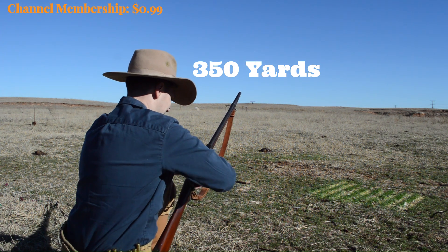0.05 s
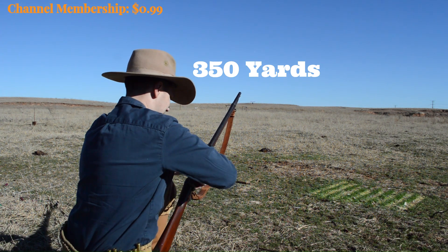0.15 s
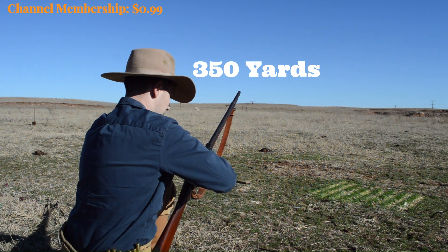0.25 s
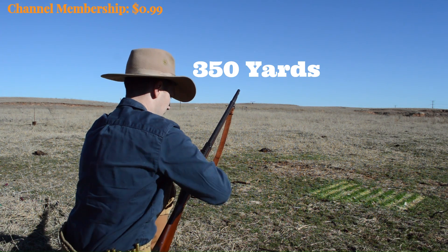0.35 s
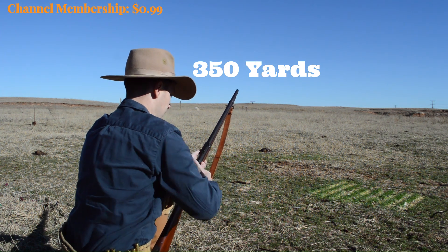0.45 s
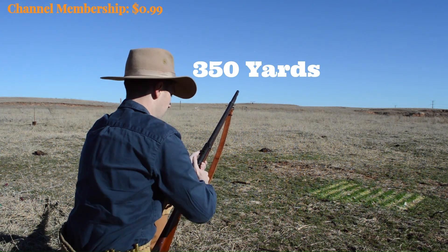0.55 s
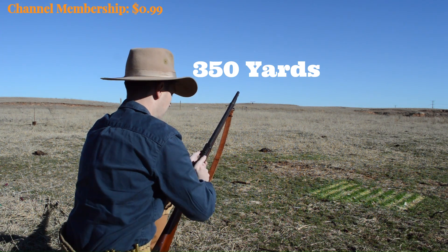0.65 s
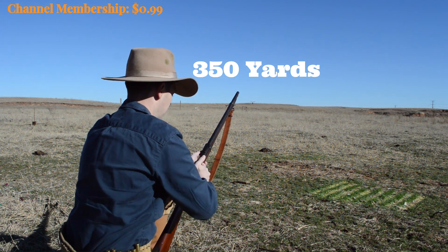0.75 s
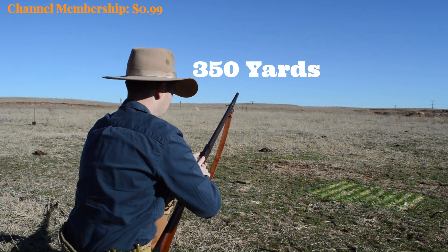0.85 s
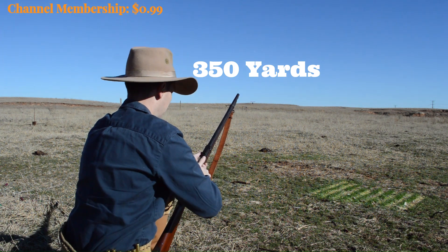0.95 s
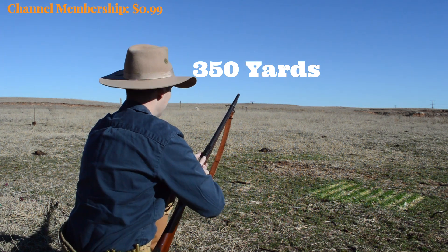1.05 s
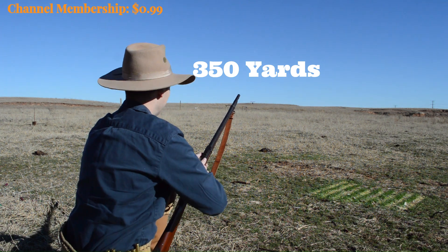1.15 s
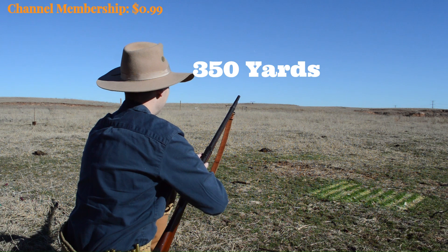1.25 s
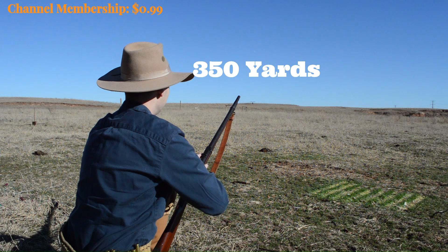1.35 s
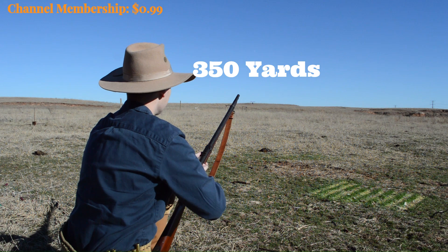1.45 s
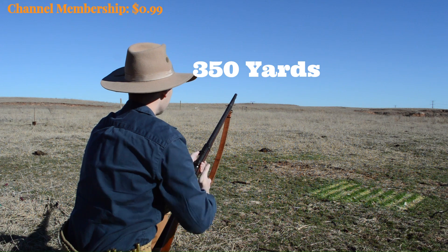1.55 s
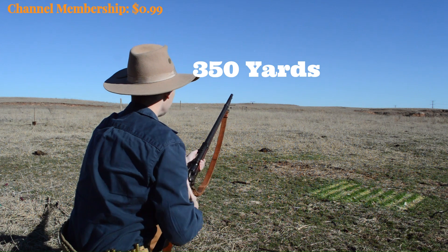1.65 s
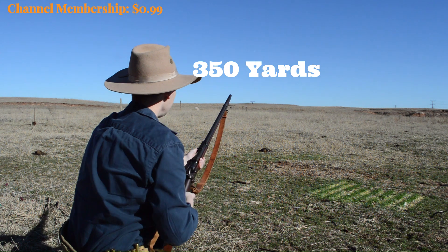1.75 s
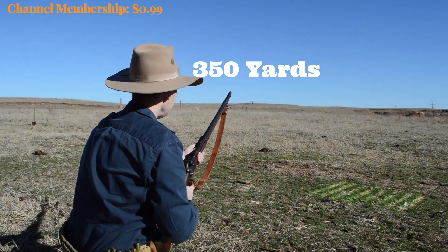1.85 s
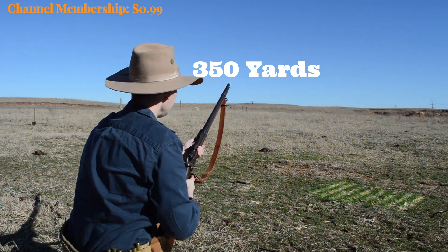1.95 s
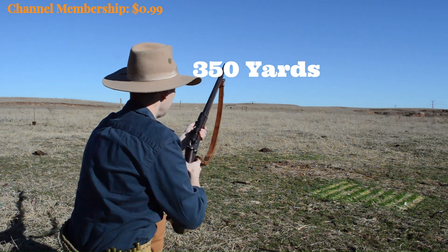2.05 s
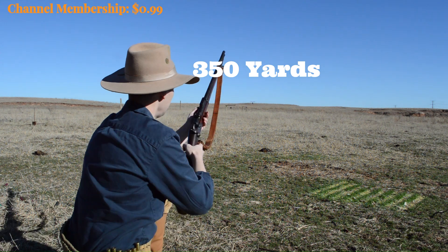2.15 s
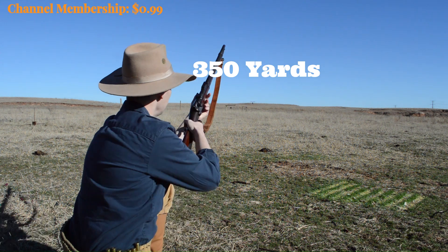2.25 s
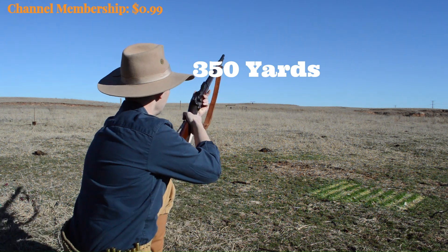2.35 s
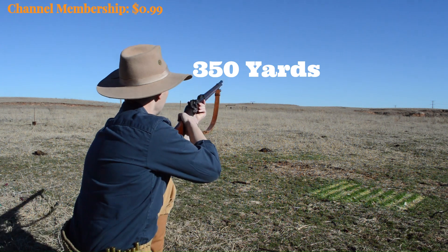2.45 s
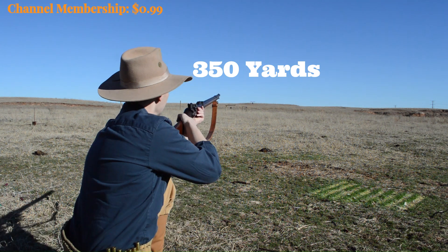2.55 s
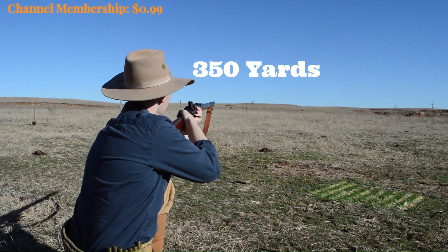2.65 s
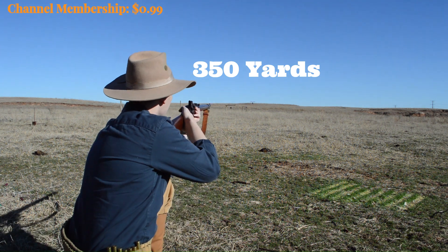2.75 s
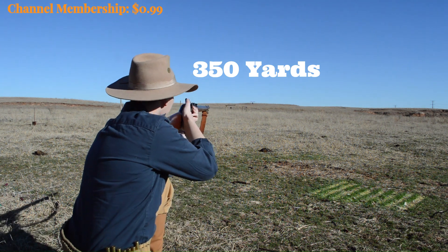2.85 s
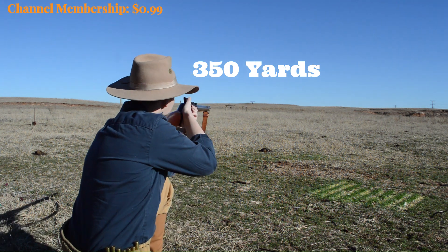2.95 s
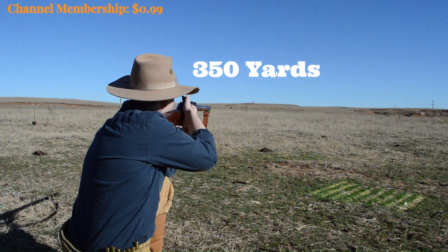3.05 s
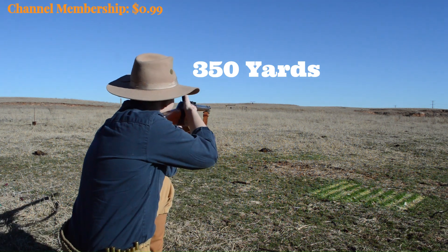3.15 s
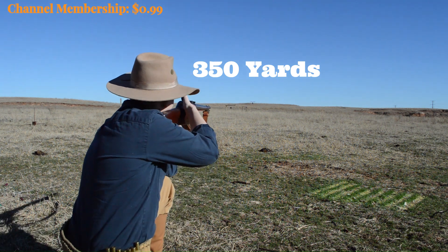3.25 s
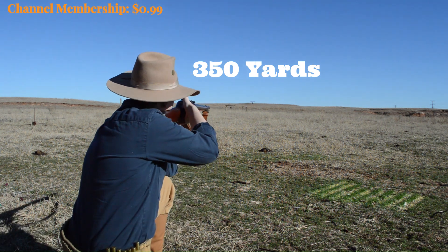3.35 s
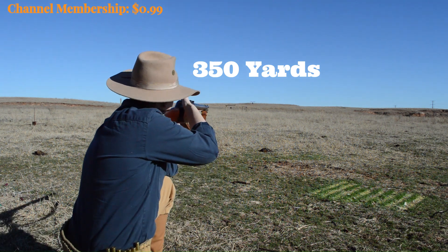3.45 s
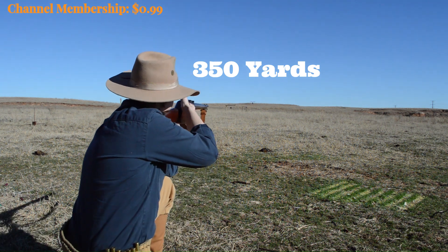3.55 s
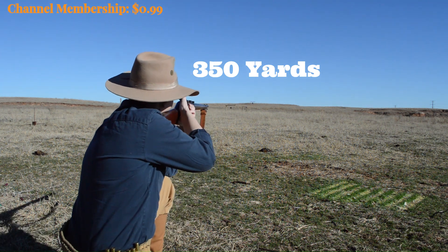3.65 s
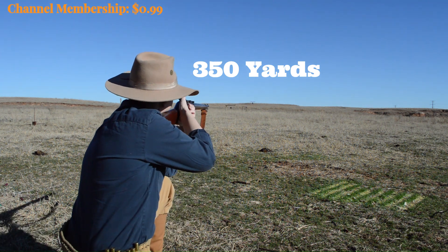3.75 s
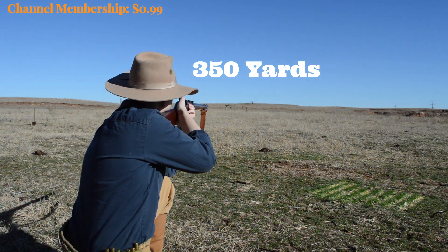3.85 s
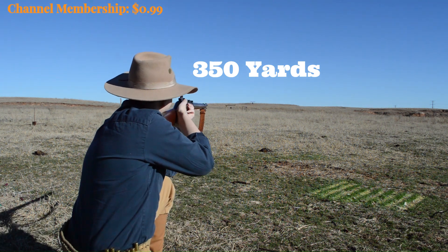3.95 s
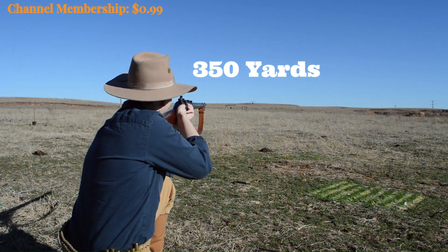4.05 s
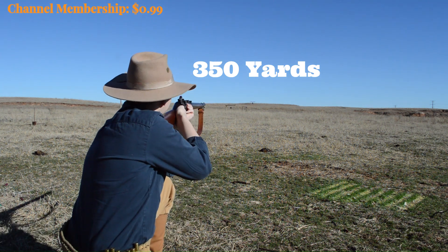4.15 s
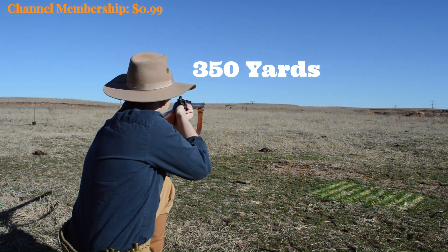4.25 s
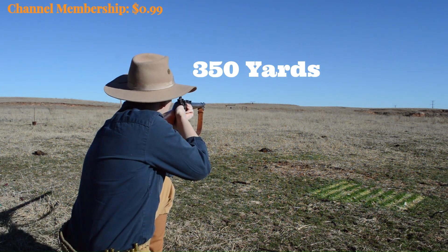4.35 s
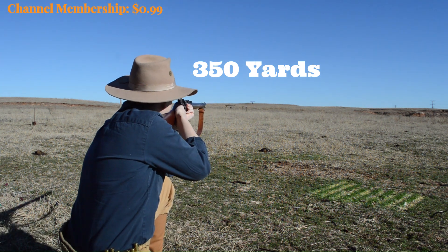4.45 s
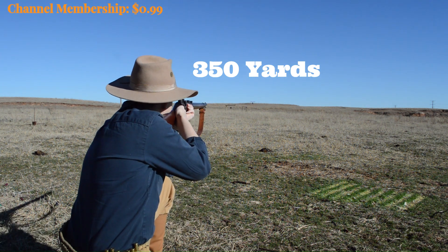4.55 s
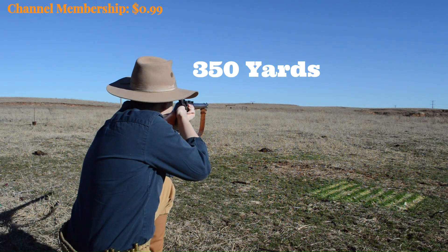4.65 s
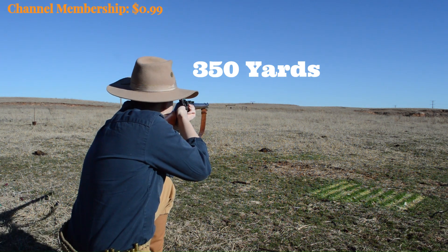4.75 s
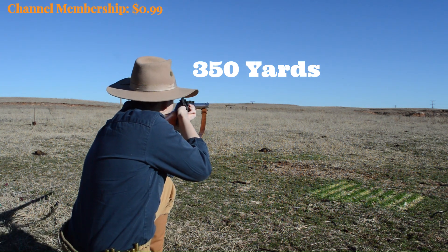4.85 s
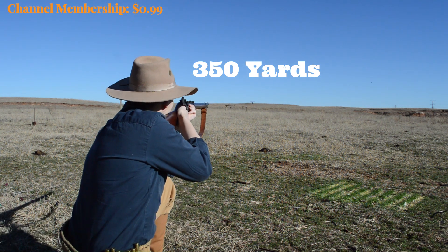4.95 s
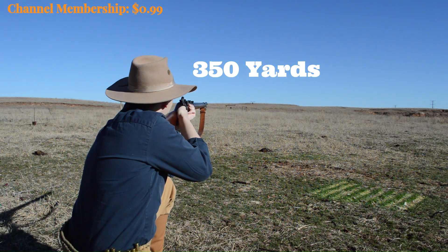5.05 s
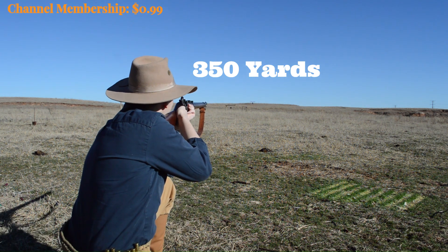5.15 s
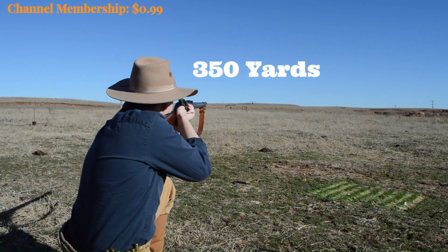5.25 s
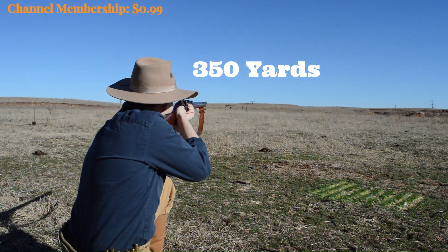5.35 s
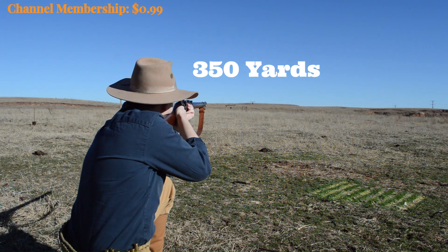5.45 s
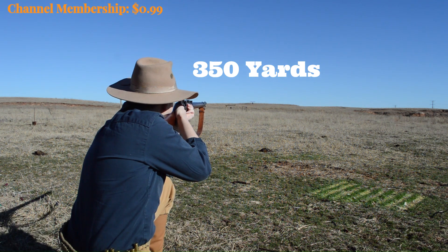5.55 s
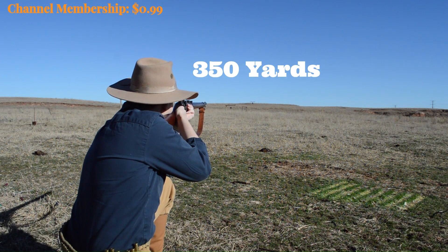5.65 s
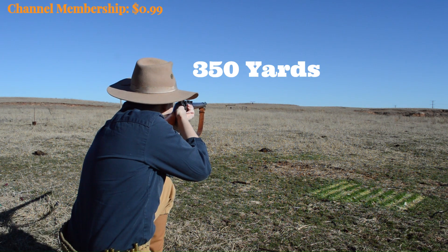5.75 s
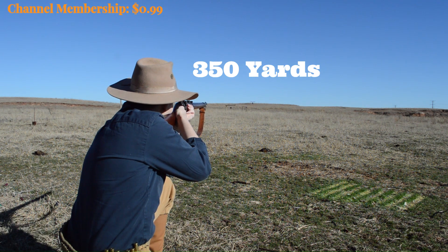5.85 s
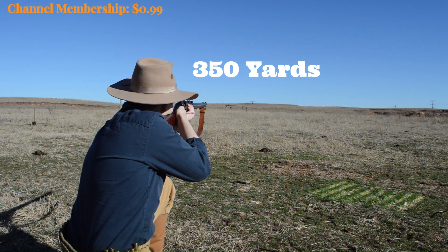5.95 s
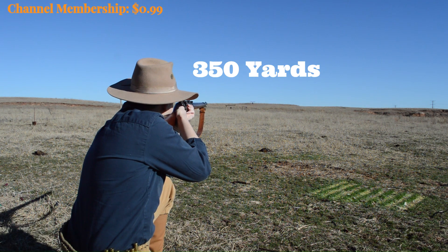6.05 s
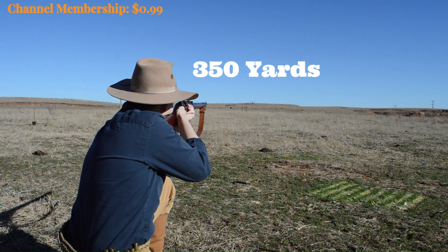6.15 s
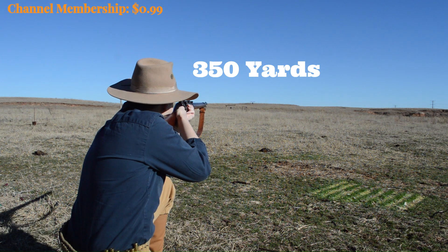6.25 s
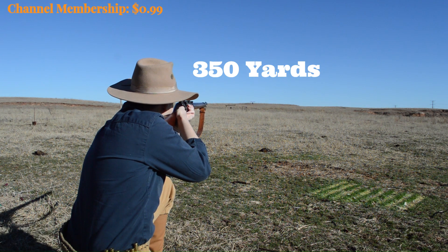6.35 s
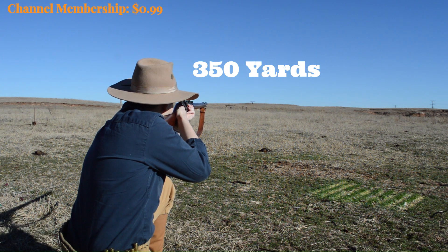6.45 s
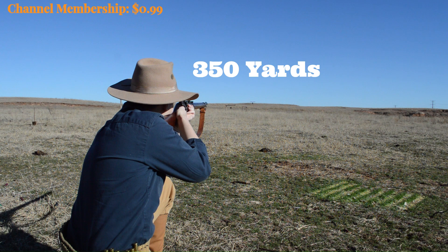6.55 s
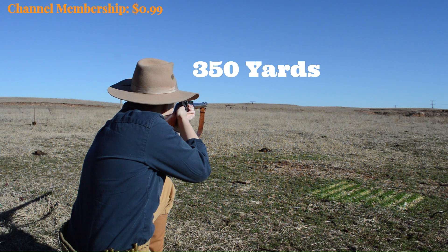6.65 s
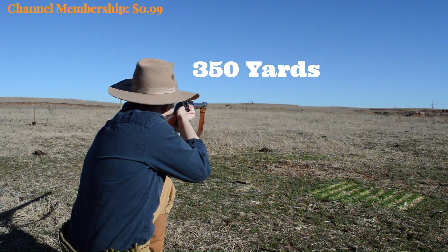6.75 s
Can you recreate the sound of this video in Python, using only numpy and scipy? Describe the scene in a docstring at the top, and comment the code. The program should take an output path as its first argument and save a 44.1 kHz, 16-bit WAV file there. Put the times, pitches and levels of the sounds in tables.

```python
"""A rifle's steel action snaps and ticks close by: each blow rings dying modes of steel and wooden stock.
Before and between the blows, sleeve and sling rustle and a shirt scrapes over the microphone, made of
coloured noise and tiny snaps; dragged cloth shudders in stick-slip tones, and bumps are dying low sines.
Cloth rumble and a deep flutter are low noise; steady hiss and a faint hum of sines lie underneath."""
import sys
import numpy as np
from scipy import signal
from scipy.fft import rfft, irfft
from scipy.io import wavfile
from scipy.ndimage import uniform_filter1d

SR = 44100
rng = np.random.default_rng(int(sys.argv[2]) if len(sys.argv) > 2 else 0)


def log_audio(samples):
    """Write samples as a 16-bit WAV file to the path given in sys.argv[1]."""
    # one column per channel
    frames = np.atleast_2d(samples).T
    # limit to full scale, then quantise
    limited = np.clip(frames, -1, 1)
    pcm = np.round(limited * 32767).astype(np.int16)
    wavfile.write(sys.argv[1], SR, pcm)


N = 300321
TIME = np.arange(N) / SR


def gain_of(db):
    """Decibels to amplitude."""
    return 10 ** (np.asarray(db) / 20)


def evened(x):
    """Scales to an rms of one."""
    return x / np.sqrt(np.mean(x ** 2) + 1e-20)


def add(mix, s, sound):
    """Mixes a sound in at time s, cut off at the end of the mix."""
    part = mix[round(s * SR):][:len(sound)]
    part += sound[:len(part)]


def read(points, hz):
    """Reads a (frequency, value) table on a log-frequency axis."""
    at, value = np.transpose(points)
    return np.interp(np.log(hz + 1), np.log(at), value)


def coloured(x, points):
    """Gives x a spectrum, at an rms of one."""
    gain = gain_of(read(points, np.fft.rfftfreq(N, 1 / SR)))
    return evened(irfft(rfft(x) * gain, N))


def wander(width_hz):
    """Smooth random drift of unit rms: noise under a Gaussian low-pass."""
    lowpass = np.exp(-(np.fft.rfftfreq(N, 1 / SR) / width_hz) ** 2)
    return evened(irfft(rfft(rng.standard_normal(N)) * lowpass, N))


def fibres(per_s, spread_db, smooth, flutter_db):
    """Threads catching and letting go: tiny snaps of uneven size over a smooth slide, in clumps."""
    catches = rng.random(N) < per_s / SR
    direction = rng.choice([-1, 1], N)
    size = gain_of(spread_db * np.minimum(rng.exponential(1, N), 4))
    slide = smooth * rng.standard_normal(N)
    return (evened(catches * direction * size) + slide) * gain_of(flutter_db * wander(74))


def swell(middle, length, shape=1.84):
    """A movement that gathers and dies away; its length is taken at half height."""
    grid = TIME[::SR // 1000]  # about one point per millisecond
    curve = .5 ** (abs(2 * (grid - middle) / length) ** max(shape, 1))
    return np.interp(TIME, grid, curve)


def swells(rows, shape):
    """The joint gain of (middle [s], length [s], level [dB]) movements, their powers summed."""
    return np.sqrt(sum((gain_of(db) * swell(middle, length, shape)) ** 2 for middle, length, db in rows))


def held(start, stop, attack, release):
    """Rises from start, holds, and dies away after stop."""
    rise = np.clip((TIME - start) / attack, 0, 1)
    return rise * np.exp(-np.clip((TIME - stop) / release, 0, 20))


def ring(hz, db, t60, phase, t):
    """A sum of dying modes; t60 is the time to fall by 60 dB, phase is in turns."""
    envelope = gain_of(db[:, None] - 60 * t / t60[:, None])
    return (envelope * np.sin(2 * np.pi * (hz[:, None] * t + phase[:, None]))).sum(0)


# mains hum: (frequency [Hz], rms level [dB])
HUM = [(60, -63), (120, -66), (180, -72), (240, -75.5)]
# steady hiss: (frequency [Hz], relative level [dB])
HISS_COLOUR = [(15, -7), (30, 0), (60, 5), (120, 3), (250, 2.5), (500, 0.5), (800, -1.5), (1600, -4),
               (3000, -5), (8000, -5.5), (15800, -7)]
# how alike the hiss is in the two channels: (frequency [Hz], likeness [0 to 1])
HISS_LIKENESS = [(30, 0.92), (250, 0.86), (1000, 0.78), (2000, 0.75), (4000, 0.53), (8000, 0.52),
                 (15000, 0.38)]


def background(hiss_db=-50):
    """Faint hum and even hiss; toward the treble each channel hisses more on its own."""
    hum = sum(gain_of(db) * np.sqrt(2) * np.sin(2 * np.pi * (hz * TIME + rng.random())) for hz, db in HUM)
    same = np.clip(read(HISS_LIKENESS, np.fft.rfftfreq(N, 1 / SR)), 0, 1)
    shared = rfft(rng.standard_normal(N))
    own = rfft(rng.standard_normal((2, N)))
    hiss = irfft(np.sqrt(same) * shared + np.sqrt(1 - same) * own, N)
    return gain_of(hiss_db) * coloured(hiss, HISS_COLOUR) + hum


# the shirt's deep stirring while the aim is held: (middle [s], length [s], level [dB])
FLUTTERS = [(5.83, 0.026, -48), (5.96, 0.23, -49), (6.215, 0.032, -41), (6.36, 0.16, -47), (6.47, .03, -52)]
# its spectrum: (frequency [Hz], relative level [dB])
FLUTTER_COLOUR = [(15, -25), (35, -4), (70, 2), (130, -3.5), (220, -12), (400, -22), (1500, -53)]


def flutter():
    """Deep, lumpy stirring of the shirt: low noise under gathering and dying swells."""
    return swells(FLUTTERS, shape=1.4) * coloured(rng.standard_normal(N), FLUTTER_COLOUR)


# cloth pressing and flexing against the microphone: (middle [s], length [s], relative level [dB])
PRESSES = [(.01, 0.16, -45.5), (1.19, .03, -40.5), (1.66, 0.11, -46), (1.97, 0.24, -48), (2.24, 0.089, -38),
           (2.39, 0.066, -37), (2.715, 0.084, -35.5), (3.125, .04, -40), (4.47, 0.07, -48.5)]
# rumble of moving cloth: (frequency [Hz], relative level [dB])
RUMBLE_COLOUR = [(15, -29), (30, -11), (60, -2.5), (100, 3), (140, 0.5), (250, -7.5), (400, -14),
                 (800, -11.5), (3000, -59)]


def flexing(stroke, rub, press_db=-1, stroke_db=-15, rub_db=-9.0):
    """Low rumble of moving cloth: every stroke and rub carries some, and presses add their own."""
    presses = gain_of(press_db) * swells(PRESSES, shape=1.35)
    push = np.linalg.norm([presses, gain_of(stroke_db) * stroke, gain_of(rub_db) * rub], axis=0)
    return push * coloured(rng.standard_normal(N), RUMBLE_COLOUR)


# strokes of sleeve and sling: (middle [s], length [s], relative level [dB])
STROKES = [(.042, 0.055, -42.5), (.346, 0.072, -41), (.425, 0.073, -44.5), (.54, 0.11, -48),
           (.655, 0.044, -49), (1.055, 0.042, -48), (1.19, .04, -51.5), (1.532, .02, -44),
           (1.58, 0.084, -40), (1.665, 0.098, -46.5), (1.765, 0.092, -45.5), (1.838, 0.023, -46),
           (1.905, 0.028, -44), (1.965, 0.15, -45.5), (2.055, 0.12, -53), (2.11, 0.059, -39.5),
           (2.175, 0.065, -32), (2.255, 0.066, -34.5), (2.34, 0.19, -41)]


def sleeve_motion():
    """How strongly the sleeve slides: a swell for each stroke."""
    return swells(STROKES, shape=1.45)


# a light brush of the sleeve: (frequency [Hz], relative level [dB])
BRUSH_COLOUR = [(150, -0.5), (400, 5.5), (900, -3.5), (1500, -5), (2500, -14.5), (4300, -13), (6500, -12),
                (10000, -21), (16000, -40)]
# the nasal rasp of a firm stroke: (frequency [Hz], relative level [dB])
RASP_COLOUR = [(300, -12), (1000, -7.5), (1300, 3), (1850, -4), (2350, -8.5), (3000, -6), (3600, -11.5),
               (4400, -14.5), (6200, -15), (10000, -19.5), (16000, -26)]


def sleeve(stroke, brush_db=-4, rasp_db=-1.0, firm_db=-41, rasp_growth=0.57):
    """The arm and sling slide: a soft brush, and a rasp that takes over as the stroke gets firmer."""
    firmness = np.minimum(stroke / gain_of(firm_db), 1) ** rasp_growth
    brush = coloured(fibres(per_s=1100, spread_db=3.5, smooth=0.72, flutter_db=3.0), BRUSH_COLOUR)
    rasp = coloured(fibres(per_s=1500, spread_db=4.5, smooth=1.3, flutter_db=1.5), RASP_COLOUR)
    return stroke * (gain_of(brush_db) * (1.5 - firmness) * brush + gain_of(rasp_db) * firmness * rasp)


# the shirt drags over the microphone as the rifle comes up: it grips, surges to a peak and lets go
DRAG_START_S, DRAG_STOP_S, DRAG_ATTACK_S, DRAG_RELEASE_S = 2.405, 2.616, 0.033, 0.0095
DRAG_PEAK_S, DRAG_SURGE_S, DRAG_DB, DRAG_TREBLE_DB = 2.542, .24, -23.5, 0.5
# then it creeps to rest, its fizz dying sooner than its body; the dulling adds to the fade
CREEP_DB, CREEP_FADE_DB_PER_S, CREEP_STOP_S = -38, 12.5, 3.145
CREEP_TREBLE_DB, CREEP_DULLING_DB_PER_S = 4, 22
# lighter rubs as the arm moves: (middle [s], length [s], body level [dB], fizz relative to body [dB])
RUBS = [(1.193, 0.026, -52, -15), (2.02, 0.29, -51.5, -8), (2.418, 0.0093, -34.5, 6),
        (2.863, 0.043, -46, 8.5), (3.127, 0.047, -35.5, -11), (3.277, 0.14, -41.5, -8),
        (3.372, 0.044, -46.5, -9), (3.497, .1, -44, -4.5), (3.72, 0.42, -48, -3.5), (3.979, 0.11, -46, -6),
        (4.085, .11, -48.5, -12), (4.42, 0.35, -56.5, -12), (4.747, 0.4, -56.5, -11)]


def shirt_motion():
    """Gains of the shirt's body and fizz: one hard drag, a creep to rest, and light rubs."""
    drag = gain_of(DRAG_DB) * swell(DRAG_PEAK_S, DRAG_SURGE_S)
    drag = drag * held(DRAG_START_S, DRAG_STOP_S, DRAG_ATTACK_S, DRAG_RELEASE_S)
    since = np.maximum(TIME - DRAG_STOP_S, 0)
    creep = gain_of(CREEP_DB - CREEP_FADE_DB_PER_S * since)
    creep = creep * held(DRAG_STOP_S, CREEP_STOP_S, DRAG_RELEASE_S, DRAG_RELEASE_S)
    body_rubs = swells([row[:3] for row in RUBS], shape=1.95)
    fizz_rubs = swells([(s, length, db + treble_db) for s, length, db, treble_db in RUBS], shape=1.2)
    drag_fizz = drag * gain_of(DRAG_TREBLE_DB)
    creep_fizz = creep * gain_of(CREEP_TREBLE_DB - CREEP_DULLING_DB_PER_S * since)
    body = np.linalg.norm([drag, creep, body_rubs], axis=0)
    return body, np.linalg.norm([drag_fizz, creep_fizz, fizz_rubs], axis=0)


# the lumpy body of the scrape: (frequency [Hz], relative level [dB])
SCRAPE_BODY = [(80, -21), (190, -5.5), (370, 2), (600, 1), (850, 0), (1250, -0.5), (2500, -4.5), (4000, -9),
               (7000, -15), (16000, -52)]
# its fine fizz: (frequency [Hz], relative level [dB])
SCRAPE_FIZZ = [(1000, -70), (3000, -10.5), (5000, 3), (7000, 1.5), (10000, 2), (12500, -3.5), (16000, -6.5)]


def shirt(body_gain, fizz_gain):
    """The weave scrapes over the microphone: a lumpy body and a fine fizz of denser snaps."""
    body = coloured(fibres(per_s=900, spread_db=3.0, smooth=1.27, flutter_db=1.4), SCRAPE_BODY)
    fizz = coloured(fibres(per_s=6100, spread_db=3.0, smooth=2.0, flutter_db=0.4), SCRAPE_FIZZ)
    return body_gain * body + fizz_gain * fizz


# dragged cloth sticks and slips in short bursts: (start [s], length [s], level before arch and waver [dB],
# nominal first rate [slips/s], nominal last rate [slips/s])
SHUDDERS = [(2.432, 0.047, -29.5, 350, 415), (2.471, 0.0586, -19.5, 270, 182),
            (2.535, 0.044, -23.5, 92, 180), (2.584, 0.04, -18.5, 225, 272)]


def shudder(jitter=0.11, waver_db=2.0, arch=0.87):
    """Stick-slip bursts during the hard drag, each gliding in rate under one arch of level."""
    out = np.zeros(N)
    unsteady = 1 + jitter * wander(100)
    waver = gain_of(waver_db * wander(80))
    for s, length, db, first_rate, last_rate in SHUDDERS:
        u = np.linspace(0, 1, round(length * SR))
        rate = (first_rate + (last_rate - first_rate) * u) * unsteady[round(s * SR):][:len(u)]
        turns = np.cumsum(rate) / SR
        slips = evened(np.sin(2 * np.pi * turns) + 0.2 * np.sin(4 * np.pi * turns))
        add(out, s, gain_of(db) * abs(np.sin(np.pi * u)) ** arch * slips)
    return out * waver


# soft bumps of cloth and butt against the chest, and the jolt of the hardest snap:
# (time [s], peak level before the low cut [dB], frequency [Hz], time to fall 60 dB [s])
BUMPS = [(1.186, -28, 62, 0.013), (2.229, -19.5, 60, 0.04), (2.2754, -17, 70, 0.0054),
         (2.4238, -7.5, 363, 0.0061), (2.4612, -11, 466, 0.0094), (2.621, -10.5, 282, 0.0019),
         (2.712, -22.5, 247, 0.014), (3.1149, -13, 151, 0.018), (3.584, -23, 480, 0.0091),
         (4.002, -30, 189, 0.032), (5.898, -40, 240, 0.055)]


def bumps(low_cut_hz=55):
    """Low pushes: quickly dying sines, thinned by a low cut."""
    out, t = np.zeros(N), np.arange(SR // 5) / SR
    for s, db, hz, t60 in BUMPS:
        push = np.sin(2 * np.pi * hz * t) * gain_of(-60 * t / t60)
        add(out, s, gain_of(db) * push / abs(push).max())
    return signal.sosfilt(signal.butter(2, low_cut_hz, "high", fs=SR, output="sos"), out)


# metal parts meeting: (time [s], steel level [dB], brightest pitch [Hz], its emphasis [dB],
# tilt [dB/octave], ring length [factor], stock thump relative to steel [dB],
# pitch of the steel modes [factor]: smaller parts ring higher)
CLICKS = [(0.3087, -49, 5400, 11, 3, .8, -32, 1), (0.4454, -37, 1800, 24, -6, 0.2, -14, 0.97),
          (1.1901, -48, 1270, 17, -14, 1.3, -8, 0.96), (1.4323, -46, 2100, 10, -7.5, 0.65, -23, 0.95),
          (1.771, -42.5, 1900, 18, 1, 0.58, -27, 0.89), (1.7845, -42, 2130, 39.5, 4, 1, -33, 1),
          (1.9485, -36.5, 2940, 18, 1, 0.72, -9, 1.02), (1.9697, -44, 5000, -10, 2, 0.75, -8, .9),
          (2.1946, -14.5, 7770, 16.5, 1, 0.69, -34, 1.06), (2.1986, -21.5, 3200, 10, 2.5, 0.67, -39, 1.2),
          (2.343, -26, 1650, 17.5, 4, 0.33, -13, 0.67), (2.3545, -24.5, 1460, 10, -1, 0.26, -19, .63),
          (2.3921, -38.5, 4000, 10, 2, .9, -18, 0.85), (2.411, -37, 2000, 0, -14, 1.4, 1, 0.93),
          (2.867, -29.5, 9150, 12, 1.5, 0.29, -37, 0.99), (3.104, -29.5, 694, -14, -7, 0.087, -10, .8),
          (3.565, -32, 3000, -2, -6, 0.32, -7, 1.1), (3.5823, -1.5, 2060, 5.5, -0.7, 0.93, -35, 1),
          (3.589, -29, 1810, 19, 8, 2, -15, 0.72), (3.6044, -36.5, 2180, 17, -15, 1.7, -27, 1),
          (3.7754, -18.5, 850, 16, -1, 0.8, 0, 1.02), (3.7834, -28, 7550, 17, 5, 0.72, 1.5, 0.84),
          (3.8338, -28, 6340, 21, -2.5, 1.3, -11.5, 1.26), (3.9405, -25, 7130, 3.5, 3.5, 0.91, -17, 1.07),
          (3.9611, -30.5, 6600, 18, -2, 1.3, -9, 1.32), (4.0127, -41, 1500, -2, -23, 0.44, -10, 0.93),
          (4.857, -53, 1200, 0, -1, 0.55, -19, 0.84)]
# the steel action, before each blow's factors: (frequency [Hz], relative level [dB], time to fall 60 dB [s])
STEEL = [(650, -22, 0.0074), (837, -14.5, 0.041), (1054, -7, 0.021), (1343, -6, 0.018), (1815, -9.5, 0.028),
         (2220, -4, 0.019), (2465, -9, 0.027), (2765, 0, 0.019), (3350, -11, 0.013), (4495, -1.5, .012),
         (5400, -5.5, 0.012), (6220, 3, 0.0076), (6650, -24, 0.012), (7090, -1.5, 0.011),
         (7500, -12, 0.016), (8090, -2.5, 0.0075), (9600, -14.5, 0.018), (9550, -30, .01),
         (10040, -19, 0.0063), (12440, -20, 0.012), (15200, -19, 0.012)]
# the wooden stock: (frequency [Hz], relative level [dB], time to fall 60 dB [s])
STOCK = [(164, -10, 0.2), (300, -11, 0.14), (345, -3, 0.085), (520, -40, 0.027), (720, 4, 0.061),
         (900, 8, 0.017)]


def action(rise_s=0.00012, clatter_db=-21, clatter_t60=0.016, count=120):
    """Each blow rings the steel's main modes, a thicket of weak ones, and the stock."""
    out, t = np.zeros(N), np.arange(SR // 8) / SR
    first = SR // 200  # levels are set over the first 5 ms
    steel_hz, steel_db, steel_t60 = np.transpose(STEEL)
    wood = ring(*np.transpose(STOCK), np.zeros(len(STOCK)), t)
    wood /= np.std(wood[:first])
    for s, db, bright_hz, emphasis_db, tilt_db, length, stock_db, smallness in CLICKS:
        place, weak_phase = rng.random((2, count))
        # one weak mode falls at random in each slot, closer together in the low range
        weak_hz = 650 + 13000 * ((np.arange(count) + place) / count) ** 1.7
        hz = smallness * np.r_[steel_hz, weak_hz]
        # the part that is struck favours its own range of pitch
        emphasis = emphasis_db * np.exp(-(np.log2(hz / bright_hz) / 0.17) ** 2)
        mode_db = np.r_[steel_db, np.full(count, clatter_db)] + tilt_db * np.log2(hz / 3000) + emphasis
        weak_t60 = clatter_t60 * (weak_hz / 3000) ** -.3
        t60 = max(length, .1) * np.r_[steel_t60, weak_t60]
        phase = np.r_[np.arange(len(STEEL)) / 2, weak_phase]  # main modes alternate in sign
        steel = ring(hz, mode_db, t60, phase, t) * (1 - np.exp(-t / rise_s))
        add(out, s, gain_of(db) * (steel / np.std(steel[:first]) + gain_of(stock_db) * wood))
    return out


def scene():
    """All layers feed both channels alike, except the hiss."""
    stroke = sleeve_motion()
    body_gain, fizz_gain = shirt_motion()
    cloth = flutter() + flexing(stroke, body_gain) + sleeve(stroke) + shirt(body_gain, fizz_gain) + shudder()
    return background() + cloth + bumps() + action()


def record(dry, threshold_db=-2, excess_fall_db_per_s=32, share=0.62, edge_hz=15950):
    """A limiter ducks by a share of a slowly falling peak excess; peaks clip; then the treble is cut."""
    peak_db = 20 * np.log10(abs(dry).max(0) + 1e-9)
    fall = TIME * excess_fall_db_per_s
    held_peak_db = np.maximum.accumulate(peak_db + fall) - fall
    over_db = np.maximum(held_peak_db - threshold_db, 0)
    limited = np.clip(dry / gain_of(share * uniform_filter1d(over_db, size=40)), -1, 1)
    lowpass = signal.firwin(511, edge_hz, window=("kaiser", 9), fs=SR)
    return signal.oaconvolve(limited, lowpass[None], "same")


dry = scene()
out = record(dry)
log_audio(out)
```